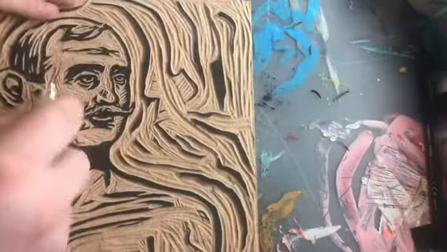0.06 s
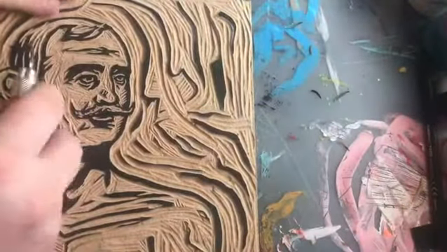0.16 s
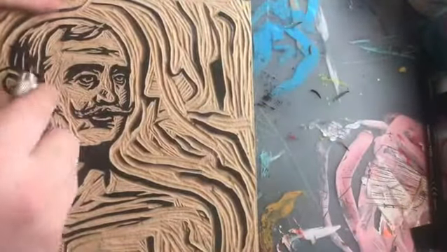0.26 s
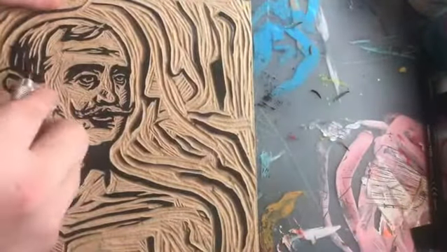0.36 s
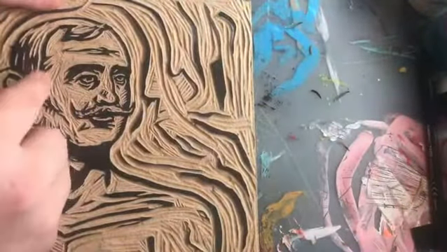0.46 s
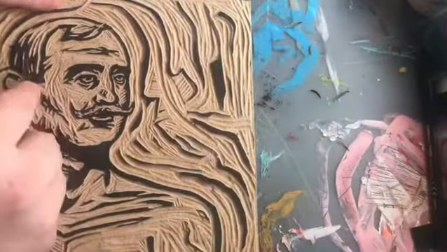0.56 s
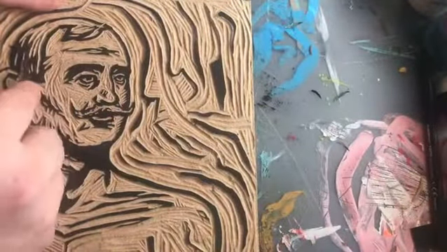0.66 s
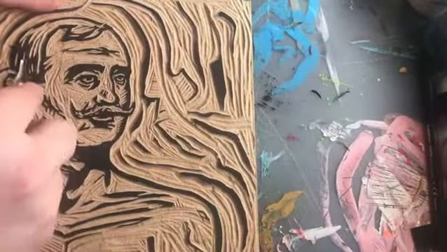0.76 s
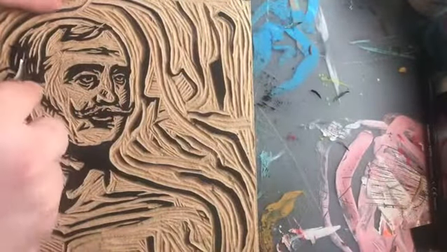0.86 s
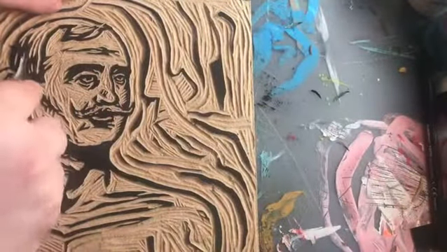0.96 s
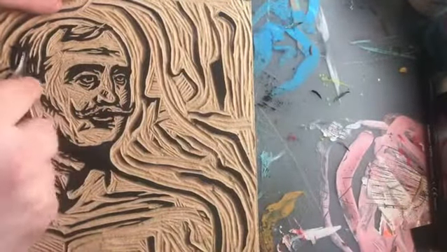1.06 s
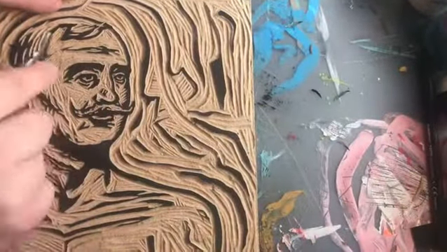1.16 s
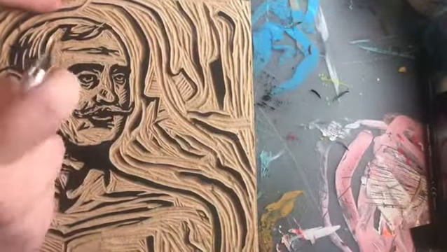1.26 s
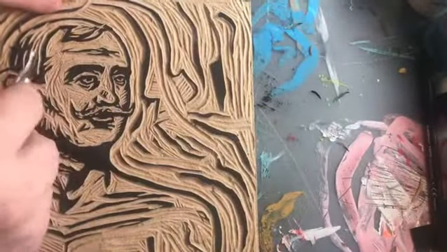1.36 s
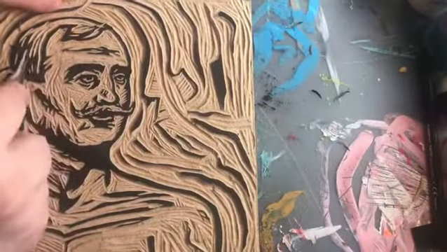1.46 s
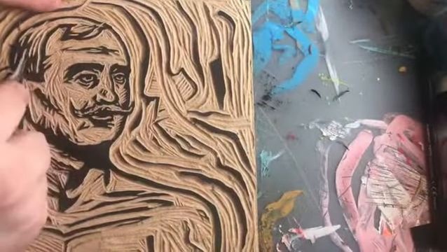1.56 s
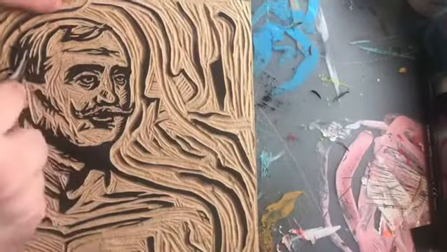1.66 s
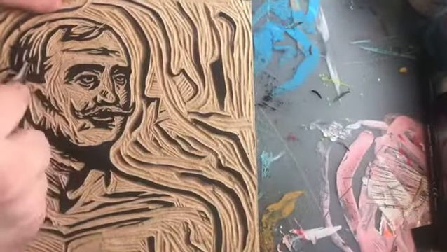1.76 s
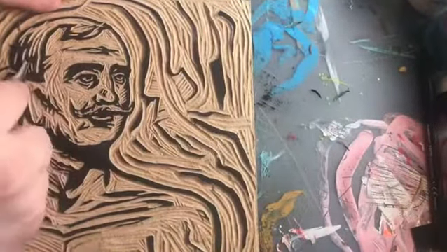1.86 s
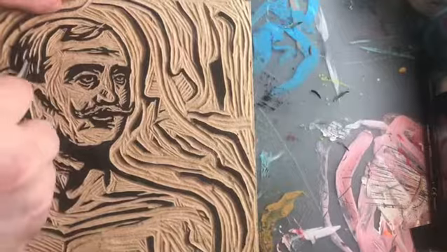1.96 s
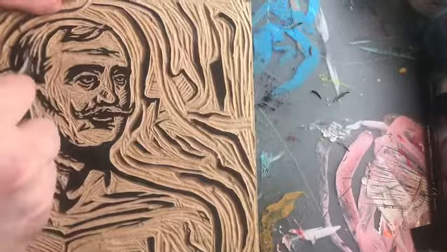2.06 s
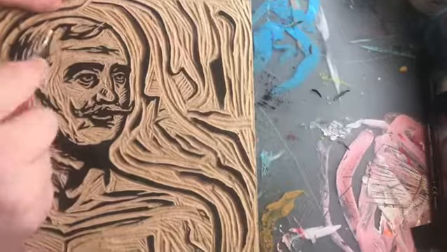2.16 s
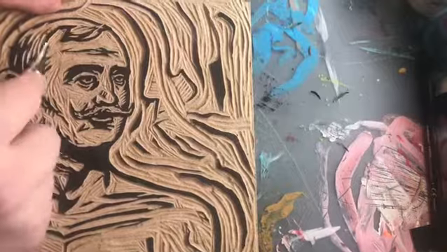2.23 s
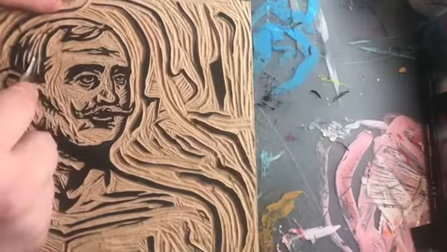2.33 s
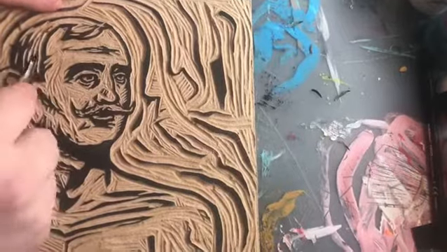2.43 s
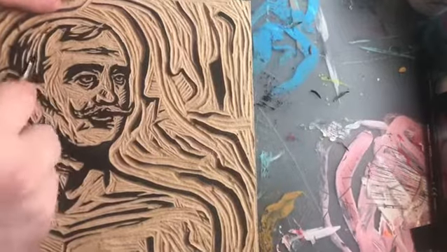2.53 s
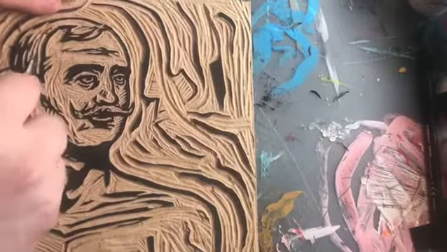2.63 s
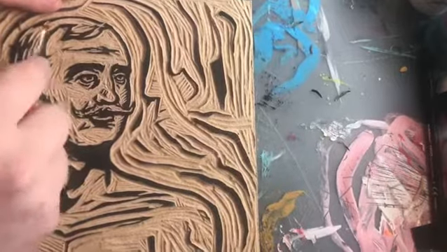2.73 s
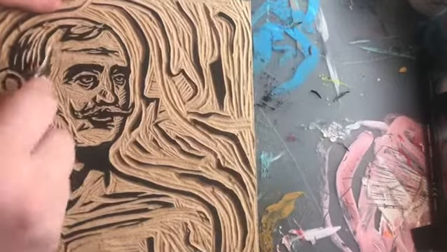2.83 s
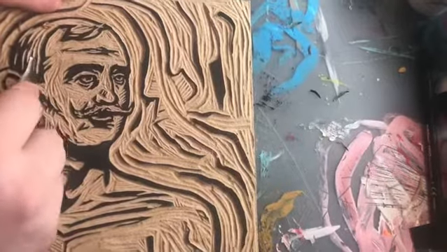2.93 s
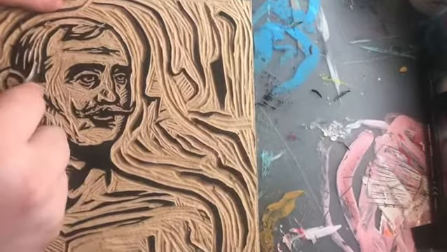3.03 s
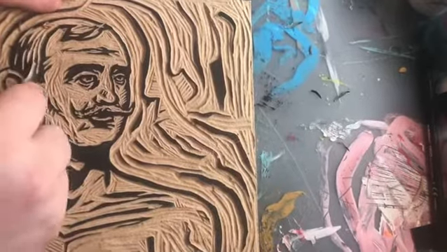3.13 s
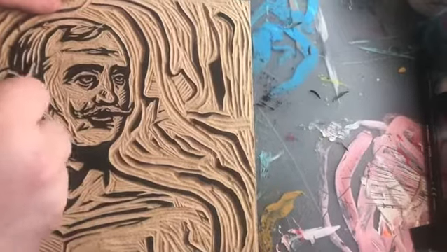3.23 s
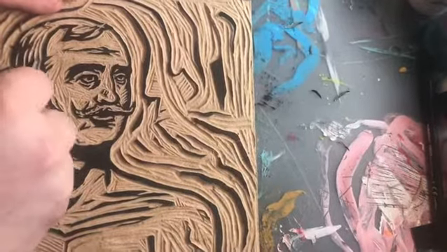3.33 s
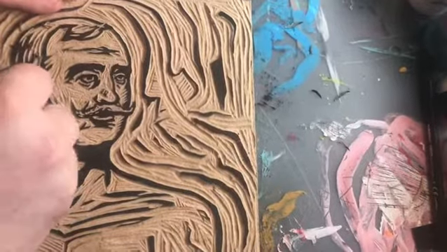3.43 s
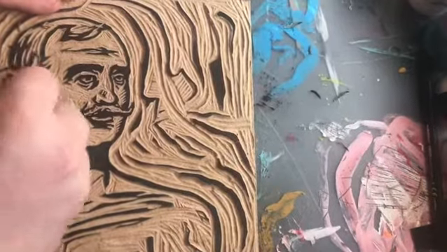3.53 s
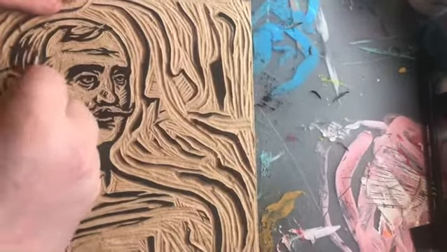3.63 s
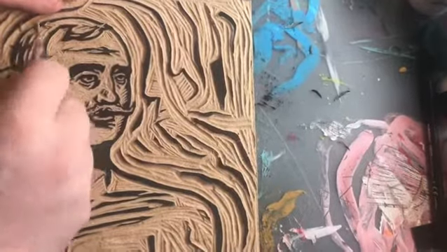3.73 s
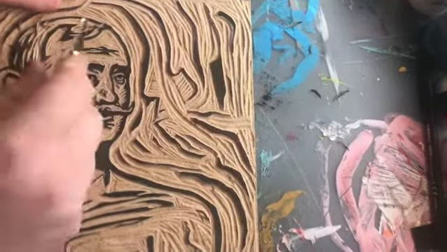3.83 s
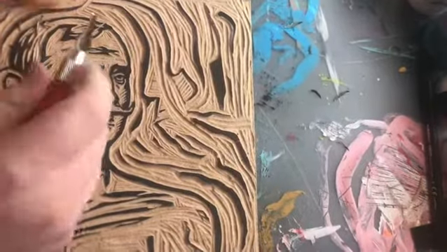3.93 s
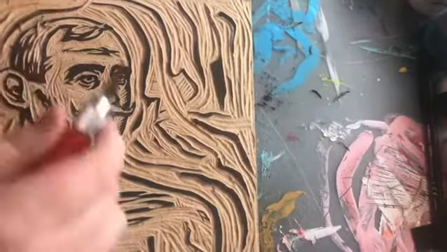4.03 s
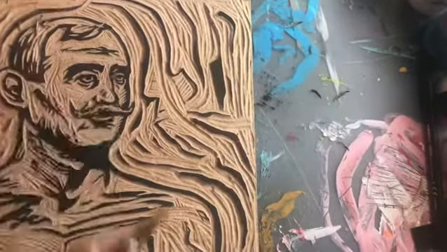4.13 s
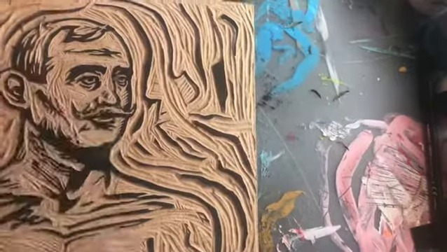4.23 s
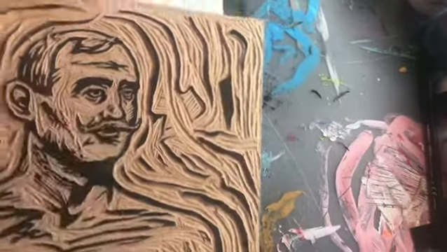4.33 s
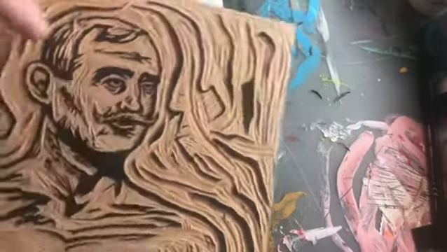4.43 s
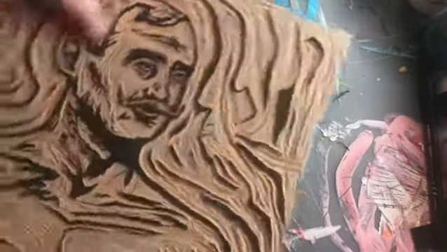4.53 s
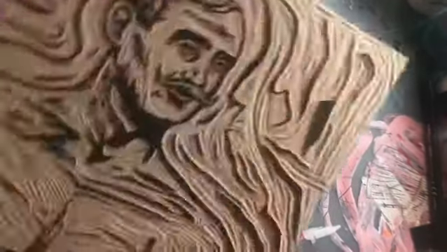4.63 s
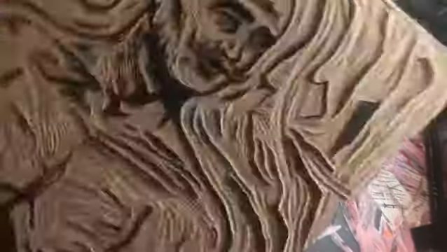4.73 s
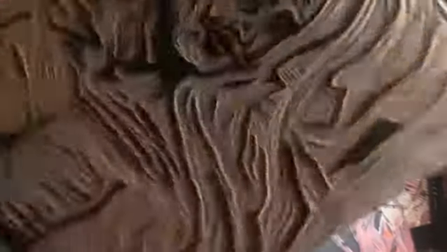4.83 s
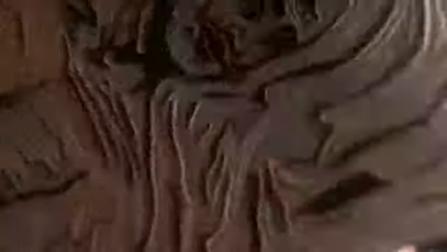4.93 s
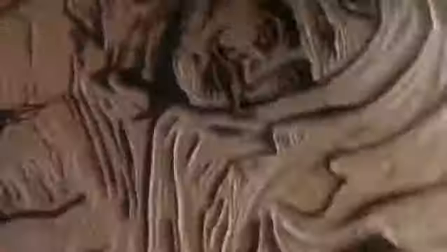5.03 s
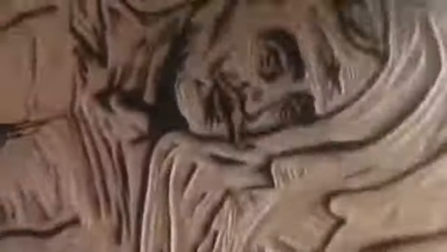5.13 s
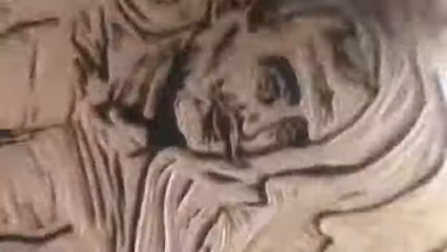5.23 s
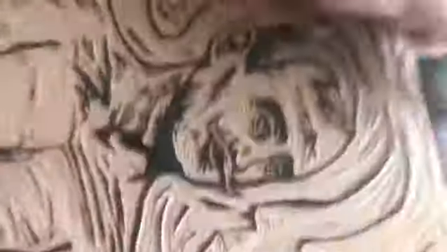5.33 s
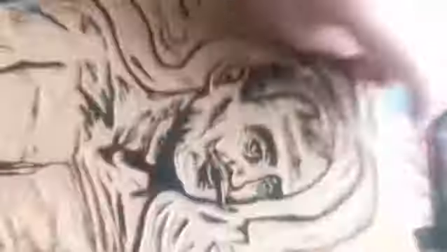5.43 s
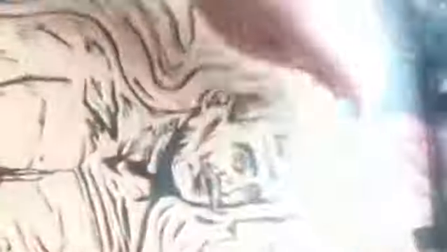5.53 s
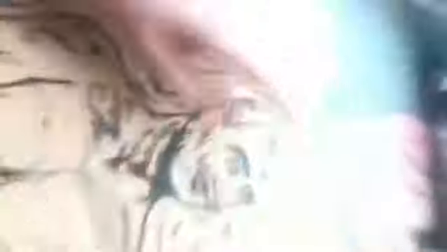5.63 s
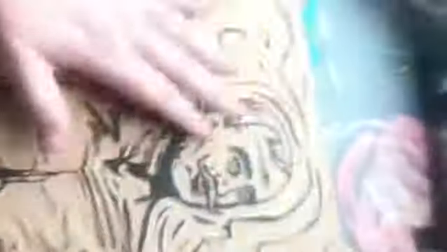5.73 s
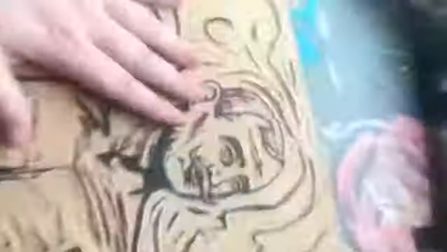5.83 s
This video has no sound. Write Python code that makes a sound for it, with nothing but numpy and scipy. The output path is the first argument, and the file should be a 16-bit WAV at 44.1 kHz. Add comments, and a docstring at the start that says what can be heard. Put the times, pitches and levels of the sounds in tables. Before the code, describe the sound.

Small woody ticks, brief fibrous scratches and a sharp snap, followed by a gritty slide and a loud, clattering series of wood-on-table thumps.

```python
"""Hands brush over wood, free steel rings faintly and a wooden printing block knocks softly on its table.
A gouge then meets the block with ticks (excited resonators) and tears fibres in short strokes while
chips snap (impulse grains through resonances). The block is swivelled with a scrape (coloured friction
noise), then lifted and knocked down on its edges (damped modes, thuds and cracks).
A small room adds echoes and a decaying tail, over faint steady air noise."""
import sys
import numpy as np
from scipy import signal
from scipy.fft import rfft, irfft, next_fast_len
from scipy.io import wavfile
from scipy.ndimage import uniform_filter1d, map_coordinates

SR = 44100
rng = np.random.default_rng(int(sys.argv[2]) if len(sys.argv) > 2 else 0)


def store_pcm(level_fs):
    """Save levels as 16-bit WAV."""
    pcm = np.round(np.clip(level_fs, -1, 1) * 32767).astype(np.int16)
    wavfile.write(sys.argv[1], SR, np.atleast_2d(pcm).T)


N = 259308

# Levels in the tables are relative; the functions may add a constant trim.
# Spectrum of the steady air noise: pitch_hz, level_db
AIR_SPECTRUM = [(15, -65), (25, -26), (48, -6), (141, -15), (175, -8), (206, -13), (476, -23), (962, -26.5),
                (1040, -28.5), (1370, -30), (1480, -31), (1610, -32), (16000, -41.5)]
AIR_DB = -64
# Decay time of the room tail: pitch_hz, t60_s
ROOM_DECAY = [(100, 0.67), (300, 0.38), (1000, 0.34), (5000, 0.27), (14000, 0.27)]
# Echoes from the table and things on it: delay_s, gain
NEAR_ECHOES = [(.0019, 0.22), (.0043, -0.039), (.0066, 0.053), (0.0098, 0.18), (0.014, 0.053)]
# Bands cancelled by reflections at the microphone: pitch_hz, width_hz, share_removed (0-1)
CANCELLED_BANDS = [(54, 3.2, 0.4), (90, 7, 0.2), (145, 19, 0.2), (226, 6.7, 0.9), (458, 65, 0.73),
                   (772, 80, 0.08)]
TOP_HZ = 16300  # upper band limit

# Hands brush over the wood: start_s, length_s, level_db
BRUSH_STROKES = [(.01, .14, -64), (4.85, 0.014, -51), (4.95, 0.069, -49), (5.155, 0.15, -47),
                 (5.38, 0.0067, -44), (5.655, 0.19, -48)]
# Spectrum of skin on wood: pitch_hz, level_db
SKIN_SPECTRUM = [(100, 7), (280, 13), (420, 7), (600, 2), (900, 0.5), (1500, -3), (3000, -6.5),
                 (6500, -8.5), (10000, -13.5), (16000, -16)]
# Faint ring of the free steel as the gouge is moved into place: pitch_hz, width_hz, level_db
STEEL_MODES = [(4150, 17, 7), (6400, 42, 2)]
TING_S, TING_DB = 0.018, -52

# The block is swivelled in one move: time_s, scrape_db, hiss_db
SLIDE_LEVELS = [(3.7, -64, -72.5), (3.72, -67.5, -77), (3.862, -57, -63), (4.08, -76.5, -79),
                (4.14, -57, -70), (4.204, -50.5, -58), (4.22, -58.5, -66), (4.248, -48.5, -61),
                (4.318, -58.5, -66), (4.34, -42, -55.5), (4.4, -39.5, -50), (4.658, -36.5, -45.5),
                (4.676, -30, -35.5), (4.692, -44.5, -48), (4.806, -44.5, -45), (4.878, -70, -63),
                (4.9, -100, -70)]
# Spectra of the scrape and of the rubbing hiss: pitch_hz, level_db
SCRAPE_SPECTRUM = [(260, -43), (450, -1), (598, -10), (726, -4.5), (993, -11), (1340, -5.5), (2100, -8),
                   (2900, -8), (4100, -8), (6150, -11.5), (16000, -50)]
RUB_SPECTRUM = [(200, -13), (1200, -30), (3000, -11), (6300, 13), (9000, 9), (10300, 2.5), (12000, 9.5),
                (16000, 0)]
RUMBLE_DB, RUMBLE_GROWS = -40.5, 0.69  # level at the strongest scrape; dB per dB of scrape
# The gap under the tilting block hoots: start_s, length_s, level_db
HOOT_STROKES = [(4.485, .12, -40.5)]
# The block shudders on its edge as it is tipped: start_s, length_s, level_db
SHUDDER_STROKES = [(5.0, 0.059, -35), (5.17, 0.06, -36.5), (5.66, 0.061, -48)]
# Resonances of the shuddering block: pitch_hz, width_hz, level_db
SHUDDER_RESONANCES = [(69, 9.1, -1), (123, 47, -10), (188.7, 20, -4)]
# Low resonances of the block lying on the table: pitch_hz, width_hz, level_db
BODY_MODES = [(70, 13, -2.5), (124.5, 16.5, 0.5), (170.7, 53.6, -2), (269, 60, -3), (374.4, 63.4, -8)]

# The block knocks on the table: start_s, thud_db, ring_db, clack_db, clack_pitch_hz
BLOCK_KNOCKS = [(0.053, -45, -55, -84, 800), (0.096, -48, -39, -75, 800), (0.2, -55, -33, -52, 700),
                (4.139, -40, -47.5, -55, 905), (4.213, -41, -45.5, -59, 885), (4.405, -36, -37, -41, 900),
                (4.823, -34.5, -37.5, -43, 900), (4.981, -33, -26.5, -24, 1230),
                (5.011, -39, -34, -61, 1300), (5.031, -40, -39, -38.5, 1260), (5.188, -18.5, -15, -33, 650),
                (5.436, -19, -34, -45, 990), (5.447, -7, -20.5, -22.5, 3030), (5.546, -29, -16, -19, 710),
                (5.604, -56, -16, -23.5, 767), (5.654, -29.5, -40, -34, 716),
                (5.747, -28, -11.5, -8.5, 1046), (5.811, -36, -18, -20.5, 1010),
                (5.854, -58, -24.5, -35, 880)]
# Resonances of the table: pitch_hz, width_hz, level_db
TABLE_MODES = [(39, 3.5, -4), (68.3, 7.4, 0.5), (121.4, 16.8, 1), (189, 34, -8.5), (299, 43, -11.5)]
# Bending modes of the lifted block: pitch_hz, level_db, t60_s
BOARD_MODES = [(211, -12.5, 0.056), (278, 4, 0.04), (335, -5.5, 0.067), (368, -0.5, 0.035),
               (610, 7.5, 0.013), (683, -0.5, 0.036)]
# Higher modes of the block, woken by hard contact: pitch_hz, width_hz, level_db
CLACK_MODES = [(800, 64, 4), (990, 85, -4), (1138, 140, -5), (1300, 230, -5), (1520, 81, -5),
               (1840, 160, -7), (2346, 114, -4.5), (3090, 360, -14.5)]
# Spectrum of the crack at impact: pitch_hz, level_db
CRACK_SPECTRUM = [(500, -9), (1500, 6), (2800, 12.5), (3500, 1), (4700, 9.5), (7000, -13), (16000, -40)]
CRACK_DB, CRACK_GROWS = -13.5, 0.75  # level with a 0 dB clack; dB per dB of clack
BUILD_CYCLES = 0.74  # time constant of each mode's build-up, so the low ones speak later

# The steel tip meets the wood: start_s, tick_db, knock_db, tick_pitch_hz
TIP_TAPS = [(0.1996, -31.5, -44.5, 2590), (0.2375, -43.5, -47, 2840), (0.3459, -33, -39.5, 2590),
            (0.392, -46, -51, 2980), (0.5623, -38.5, -43, 2910), (1.3838, -40, -44, 4050),
            (1.603, -42.5, -57, 3560), (2.309, -29.5, -38, 4570), (2.9008, -36.5, -43.5, 4000)]
# The tip ringing against the wood: pitch_hz, width_hz, level_db
TIP_MODES = [(650, 43, 5), (964, 87, -4.5), (1777, 110, 2), (3530, 400, -4.5), (4470, 250, -7),
             (5150, 940, -13), (9200, 640, -24.5)]
# Chips snap and edges click: start_s, snap_db, knock_db, snap_pitch_hz
CHIP_SNAPS = [(0.967, -31, -41, 7000), (1.989, -13, -22, 4840), (1.9955, -18, -31, 4800),
              (4.912, -28, -27.5, 5100), (5.445, -37.5, -19, 7000), (5.489, -31, -17, 9000),
              (5.514, -36.5, -27, 9000)]
# Resonances of a snapping chip: pitch_hz, width_hz, level_db
CHIP_MODES = [(1830, 130, 4.5), (3600, 1100, -1), (5800, 600, 2), (9330, 540, -1.5), (13000, 5100, -14.5)]

# Each push drives the edge on until it jams: start_s, length_s, tearing_db,
# swell_db (over the push), hiss_db (fibre hiss relative to the tearing)
GOUGE_PUSHES = [(0.61, 0.149, -67, -1, -22), (0.783, 0.008, -56, -7, -8.5), (0.818, .008, -50.5, -1, -8.5),
                (.847, 0.038, -50.5, -3.5, -8.5), (0.909, 0.021, -48.5, 4, -9.5),
                (0.954, .04, -38.5, -8, -4.5), (1.821, 0.056, -54.5, -3, -10),
                (1.861, 0.025, -40.5, -2, -11), (1.902, 0.056, -43, 2, -6), (1.956, 0.03, -37, -4, -8),
                (2.45, .014, -49, 5, -8.5), (2.469, 0.11, -41.5, 4.5, -4.5), (3.147, 0.016, -50.5, 4, -19),
                (3.169, 0.047, -44.5, -5.5, -11), (3.235, 0.059, -42.5, -0.5, -11.5),
                (3.38, 0.075, -71.5, -9, 7), (3.413, 0.058, -41.5, -1.5, -5.5),
                (3.525, 0.035, -49.5, 1, -3), (3.566, 0.044, -43, 7, -1)]
PUSH_ATTACK_S, PUSH_RELEASE_S = 0.05, 0.076  # time to rise or fall by 60 dB
HISS_SWELL_DB = 4  # the edge gathers speed through a push, so the hiss grows
JUDDER_DB, JUDDER_LAG_S, JUDDER_RELEASE_S = 0.5, 0.0035, 0.14  # the block shakes a little later
JUDDER_TRADE = 0.37  # a shallow push hisses more and shakes less: dB less judder per dB of hiss
# Resonances of block and gouge under the cut: pitch_hz, width_hz, level_db
WOOD_MODES = [(669, 62, -2.5), (985, 153, -5), (1455, 108, 0.5), (1833, 67, 5.5), (2395, 120, -1),
              (3370, 430, -7.5), (4600, 1200, -10), (6670, 480, -16.5)]
# Spectrum of the fibre hiss: pitch_hz, level_db
FIBRE_SPECTRUM = [(300, -45), (1500, 0), (5000, -0.5), (9000, 0.5), (10400, -3.5), (12000, 1.5),
                  (16000, -3)]
# The edge squeaks where it skids: start_s, length_s, level_db
SQUEAK_STROKES = [(.953, 0.028, -38), (1.962, 0.011, -40)]
# Resonances of the skidding edge: pitch_hz, width_hz, level_db
EDGE_MODES = [(6760, 370, 4), (8900, 970, -4.5)]
# The edge creaks as it is pressed in or eased out: start_s, length_s, level_db
CREAK_STROKES = [(.443, 0.031, -64), (.62, 0.15, -66.5), (1.198, 0.0094, -65)]
# Resonances of the shank under pressure: pitch_hz, width_hz, level_db
SHANK_MODES = [(1500, 250, -1), (2345, 31, 8), (2720, 630, -6.5), (4300, 250, -7.5), (8800, 500, -12)]


def amp(db):
    """Decibels are a logarithmic measure of amplitude ratio."""
    return 10 ** (np.asarray(db) / 20)


def unit(x):
    """Normalisation to a root-mean-square of 1 separates character from level."""
    return x / np.sqrt(np.mean(x ** 2) + 1e-20)


def peaked(x):
    """Normalisation to a peak of 1 sets the scale of a transient."""
    return x / np.abs(x).max()


def noise():
    """White noise carries equal power at every frequency."""
    return rng.standard_normal(N)


def impulse(t):
    """A unit impulse at time zero excites all frequencies equally."""
    return 1.0 * (t == 0)


def along(points, hz):
    """Linear interpolation of (pitch_hz, value) points on a logarithmic frequency axis."""
    f, v = np.transpose(points)
    return np.interp(np.log(hz + 1), np.log(f + 1), v)


def gains(rows):
    """Envelopes interpolated in decibels, one per level column, silent outside the rows."""
    s, *columns = np.transpose(rows)
    t = np.arange(N) / SR
    return [amp(np.interp(t, s, column, left=-120, right=-120)) for column in columns]


def wobble(rate):
    """Spline interpolation of random knots, rate per second, gives a smooth random curve."""
    knots = rng.standard_normal(int(N * rate / SR) + 4)
    return map_coordinates(knots, [np.arange(N) * rate / SR])


def filtered(x, response):
    """Linear filtering multiplies the spectrum by a complex response."""
    m = next_fast_len(len(x) + SR // 4)
    return irfft(rfft(x, m) * response(np.fft.rfftfreq(m, 1 / SR)), m)[:len(x)]


def coloured(x, points):
    """Spectral shaping by a (pitch_hz, level_db) curve, at rms 1."""
    return unit(filtered(x, lambda hz: amp(along(points, hz))))


def resonance(f, centre, width):
    """A second-order resonance passes a band with unit gain at its centre."""
    return 1j * f * width / (centre * centre - f * f + 1j * f * width)


def resonate(x, modes):
    """Superposed resonances of alternating polarity colour an excitation, at rms 1."""
    def bank(f):
        return sum((-1) ** k * amp(db) * resonance(f, centre, width)
                   for k, (centre, width, db) in enumerate(modes))
    return unit(filtered(x, bank))


def grains(rate, spread_db):
    """Random microscopic ruptures: rate impulses a second, with limited log-normal sizes."""
    present = rng.random(N) < rate / SR
    sign = rng.choice([-1, 1], N)
    return unit(present * sign * amp(spread_db * np.clip(noise(), -2, 2)))


def contact(t, t60, grit):
    """Impact excitation: an impulse with a brief decaying crunch of crushed fibres."""
    return impulse(t) + grit * rng.standard_normal(len(t)) * amp(-60 * t / t60)


def add(track, s, sound):
    """Superposition of a sound on the track from s seconds."""
    part = track[round(s * SR):][:len(sound)]
    part += sound[:len(part)]


def streaked(x, depth_db, glide=0):
    """Moving contact: narrow resonances come and go, rising by glide Hz a second."""
    hz, t, z = signal.stft(x, SR, nperseg=1024)
    field = uniform_filter1d(rng.standard_normal(z.shape), size=4, axis=0)
    field = uniform_filter1d(field, size=12, axis=1)
    row, frame = np.indices(z.shape)
    moved_row = (row - glide * t / hz[1]) % (len(hz) - 1)
    field = map_coordinates(field, [moved_row, frame], order=1)
    return unit(signal.istft(z * amp(depth_db * unit(field)), nperseg=1024)[1][:N])


def stroke(s, length, attack_s, release_s, swell_db=0):
    """Exponential envelope: it rises up to s, swells while held, then dies away (times per 60 dB)."""
    t = np.arange(N) / SR - s
    outside = np.maximum(-t, 0) / attack_s + np.maximum(t - length, 0) / release_s
    swell = swell_db * (np.clip(t / length, 0, 1) - 0.5)
    return amp(swell - 60 * np.minimum(outside, 2))


def strokes(rows, attack_s, release_s):
    """The strongest of a series of stroke envelopes governs at each moment."""
    return np.max([amp(db) * stroke(s, length, attack_s, release_s) for s, length, db in rows], axis=0)


def air():
    """Steady broadband noise, shaped towards the bass."""
    return amp(AIR_DB) * coloured(noise(), AIR_SPECTRUM)


def room(x):
    """Reverberation: near surfaces echo, then a tail decays at its own speed for each frequency."""
    hz, t, z = signal.stft(rng.standard_normal(SR // 2), SR, nperseg=256)
    decay = amp(-60 * t / along(ROOM_DECAY, hz)[:, None])
    tail = signal.istft(z * decay, SR, nperseg=256)[1]
    response = np.r_[np.zeros(SR // 200), amp(-12) * tail / np.linalg.norm(tail)]  # tail after 5 ms
    for delay, gain in NEAR_ECHOES:
        response[round(delay * SR)] += gain
    return signal.fftconvolve(x, response)[:N]


def hollowed(x):
    """Destructive interference at the microphone removes narrow bands."""
    def cancellation(f):
        return np.prod([1 - np.clip(share, 0, 1) * resonance(f, centre, width)
                        for centre, width, share in CANCELLED_BANDS], axis=0)
    return filtered(x, cancellation)


def brushing():
    """Soft friction: skin rubbing on the carved face makes dense, coloured grains."""
    touch = strokes(BRUSH_STROKES, attack_s=0.3, release_s=0.2)
    rubbing = grains(rate=5200, spread_db=4.5) * amp(0.7 * wobble(77))
    return amp(3.5) * touch * streaked(coloured(rubbing, SKIN_SPECTRUM), depth_db=3.5)


def ting():
    """Free vibration: a light touch excites the narrow resonances of the free shank."""
    touch = 1.0 * (np.arange(N) == round(TING_S * SR))
    return amp(TING_DB) * peaked(resonate(touch, STEEL_MODES))


def sliding():
    """Sliding friction: the underside drags over dried paint and grit and shakes the block."""
    scrape, hiss = gains(SLIDE_LEVELS)
    effort = scrape / scrape.max()
    catches = unit(amp(1.2 * wobble(120)))
    gritty = coloured(grains(rate=16000, spread_db=3) * catches, SCRAPE_SPECTRUM)
    grit = scrape * streaked(gritty, depth_db=4, glide=1200)
    rubbing = coloured(noise() * catches, RUB_SPECTRUM)
    rub = amp(3.0) * hiss * streaked(rubbing, depth_db=4.0, glide=1300)
    rumble = amp(RUMBLE_DB) * effort ** RUMBLE_GROWS * resonate(noise(), BODY_MODES)
    gap_modes = [(270, 45, -0.5), (620, 104, -1.5), (1320, 28, -9)]  # pitch_hz, width_hz, level_db
    hoot = strokes(HOOT_STROKES, attack_s=0.38, release_s=0.42) * resonate(noise() * catches, gap_modes)
    shaking = strokes(SHUDDER_STROKES, attack_s=0.13, release_s=0.12)
    shudder = shaking * resonate(noise(), SHUDDER_RESONANCES)
    return grit + rub + rumble + hoot + shudder


def ringing(t, modes, contact_hz):
    """Modal superposition: struck modes vary in level, and a soft contact leaves out the high ones."""
    total = 0
    for k, (hz, db, t60) in enumerate(modes):
        decay = amp(db + rng.standard_normal() - 60 * t / t60)
        softness = 1 / (1 + (hz / contact_hz) ** 4)
        build_up = 1 - np.exp(-hz * t / BUILD_CYCLES)
        total = total + (-1) ** k * decay * softness * build_up * np.sin(2 * np.pi * hz * t)
    return peaked(total)


def knocking():
    """Impact: a landing edge excites a crack, a clack, the board's ring and the table's thud."""
    out, t = np.zeros(N), np.arange(SR // 2) / SR
    for s, thud_db, ring_db, clack_db, clack_hz in BLOCK_KNOCKS:
        contact_hz = 1100 * amp(0.95 * (ring_db + 20.5))  # harder blows are brighter
        thud = amp(thud_db) * peaked(resonate(impulse(t), TABLE_MODES))
        board = amp(ring_db + 0.5) * ringing(t, BOARD_MODES, contact_hz)
        # the spot struck favours some modes
        blow = resonate(contact(t, t60=0.018, grit=0.12), [(clack_hz, clack_hz * 0.33, 0)])
        clack = amp(clack_db) * peaked(resonate(blow, CLACK_MODES))
        crunch = peaked(coloured(contact(t, t60=0.0046, grit=0.53), CRACK_SPECTRUM))
        crack = amp(CRACK_DB + CRACK_GROWS * clack_db) * crunch
        add(out, s, thud + board + clack + crack)
    return out


def clicks(events, modes, click_db, knock_db, crunch_t60, grit):
    """Selective excitation: a small hard contact rings modes near its own pitch and nudges the block."""
    out, t = np.zeros(N), np.arange(SR // 4) / SR
    knock = peaked(resonate(impulse(t), BODY_MODES))
    for s, db, low_db, hz in events:
        blow = resonate(contact(t, crunch_t60, grit), [(hz, 2 * hz, 0)])
        click = amp(db + click_db) * peaked(resonate(blow, modes))
        add(out, s, click + amp(low_db + knock_db) * knock)
    return out


def tapping():
    """Impact of steel on wood: the tip's resonances tick as it meets the block."""
    return clicks(TIP_TAPS, TIP_MODES, click_db=0.0, knock_db=5.5, crunch_t60=0.013, grit=0.67)


def snapping():
    """Sudden fracture: snapping chips and clicking edges excite broad, bright resonances."""
    return clicks(CHIP_SNAPS, CHIP_MODES, click_db=-2, knock_db=-2.5, crunch_t60=0.018, grit=0.33)


def pushing():
    """A common driving force: each push sets the gains of tearing, block judder and fibre hiss."""
    pushes = []
    for s, length, db, swell_db, hiss_db in GOUGE_PUSHES:
        tear = amp(db) * stroke(s, length, PUSH_ATTACK_S, PUSH_RELEASE_S, swell_db)
        judder_db = db + JUDDER_DB - JUDDER_TRADE * hiss_db
        judder = amp(judder_db) * stroke(s + JUDDER_LAG_S, length, PUSH_ATTACK_S, JUDDER_RELEASE_S, swell_db)
        hiss_swell_db = swell_db + HISS_SWELL_DB
        hiss = amp(db + hiss_db) * stroke(s, length, PUSH_ATTACK_S, PUSH_RELEASE_S, hiss_swell_db)
        pushes.append([tear, judder, hiss])
    return np.max(pushes, axis=0)


def cutting():
    """Stick-slip fracture: fibres break in clumps, ringing the wood and shaking the block."""
    tear, judder, hiss = pushing()
    slips = unit(amp(2.6 * wobble(220)))
    breaks = grains(rate=3000, spread_db=2) * slips
    wood = tear * streaked(resonate(breaks, WOOD_MODES), depth_db=2.5, glide=301)
    body = judder * resonate(breaks, BODY_MODES)
    fine_breaks = grains(rate=17000, spread_db=7.5) * slips
    fizz = amp(-1.5) * hiss * coloured(fine_breaks, FIBRE_SPECTRUM)
    skids = grains(rate=6500, spread_db=16) * slips
    squeak = strokes(SQUEAK_STROKES, attack_s=0.035, release_s=0.035) * resonate(skids, EDGE_MODES)
    creak = strokes(CREAK_STROKES, attack_s=0.33, release_s=0.29) * resonate(noise(), SHANK_MODES)
    return wood + body + fizz + squeak + creak


def scene():
    """Superposition: all work on the block excites the room, and the air noise is added."""
    handling = brushing() + ting() + sliding() + knocking()
    carving = tapping() + snapping() + cutting()
    work = handling + carving
    return (hollowed(work + room(work)) + air())[None]


def record(dry):
    """Band limitation: two 22 Hz high-pass stages weaken the deepest bass; nothing passes TOP_HZ."""
    def band_limit(hz):
        return (hz < TOP_HZ) * (1j * hz / (1j * hz + 22)) ** 2
    return np.array([filtered(x, band_limit) for x in dry])


dry = scene()
out = record(dry)
store_pcm(out)
```